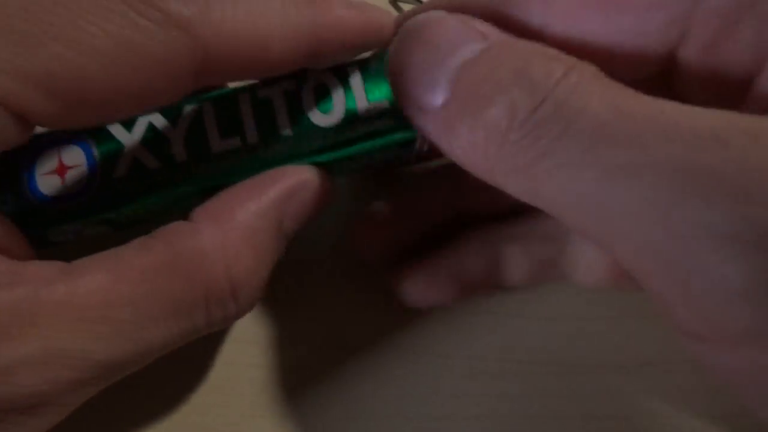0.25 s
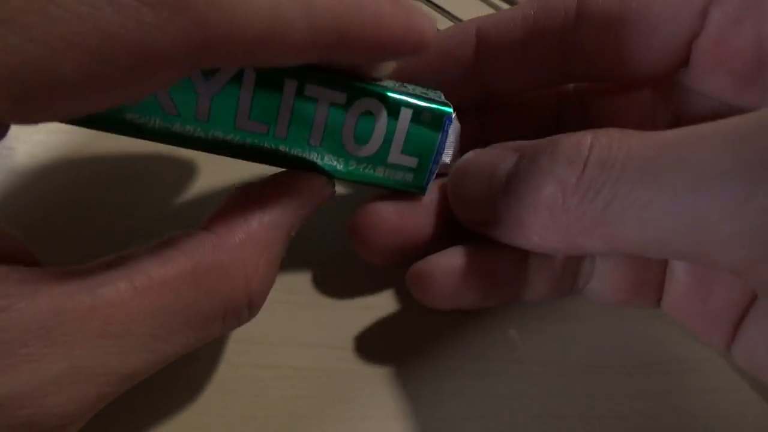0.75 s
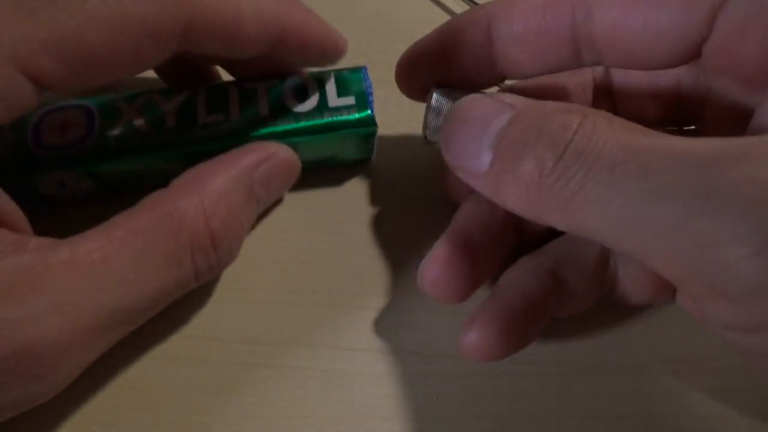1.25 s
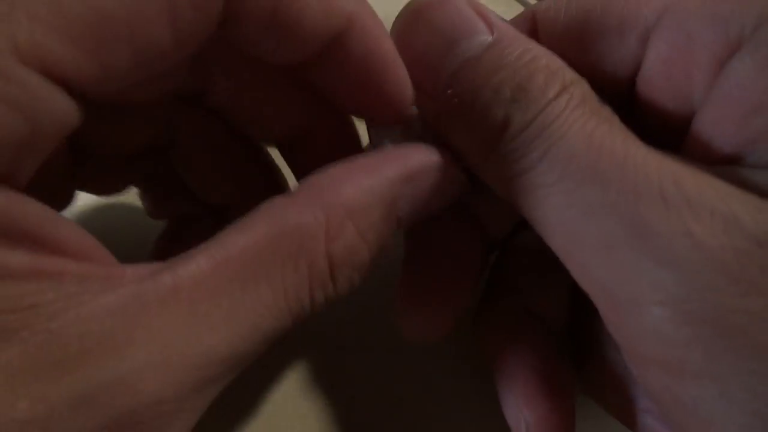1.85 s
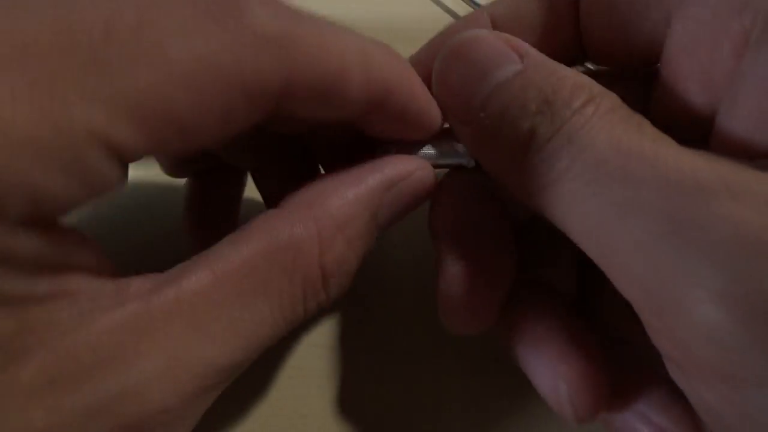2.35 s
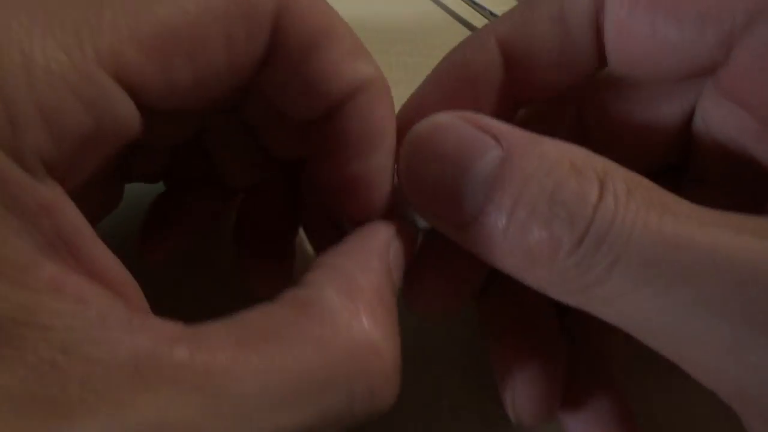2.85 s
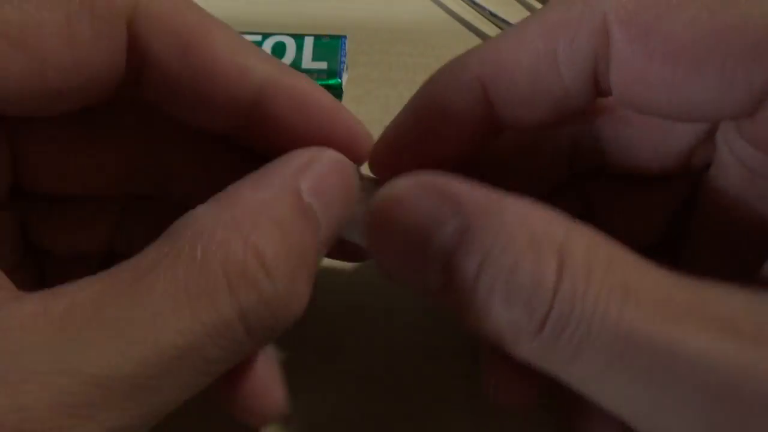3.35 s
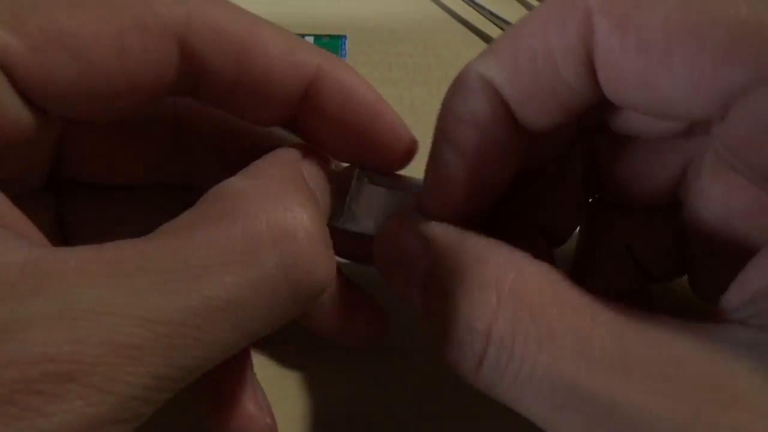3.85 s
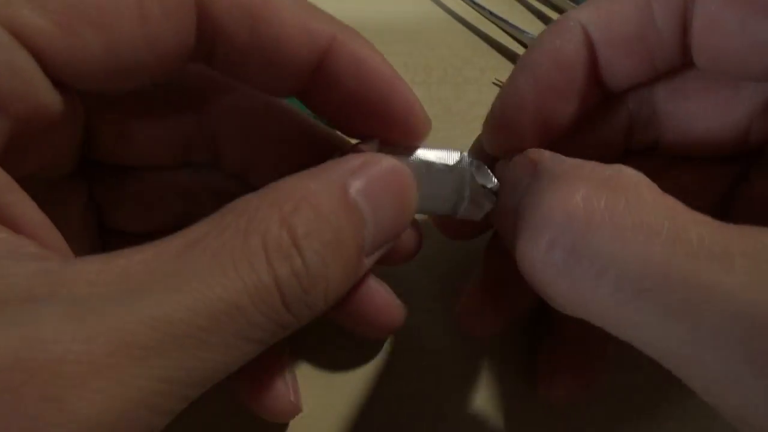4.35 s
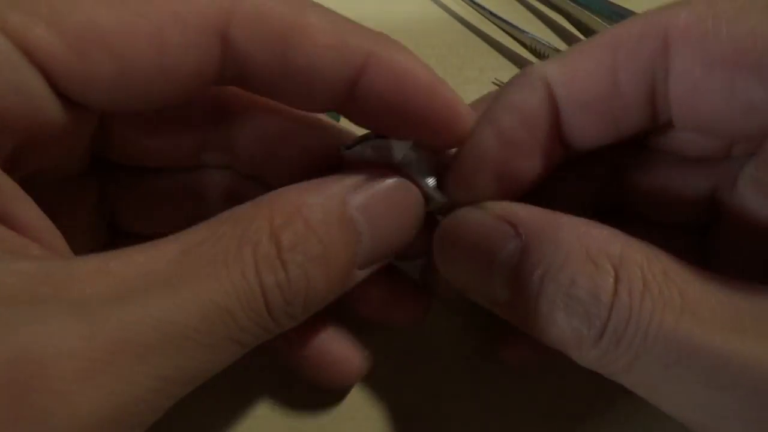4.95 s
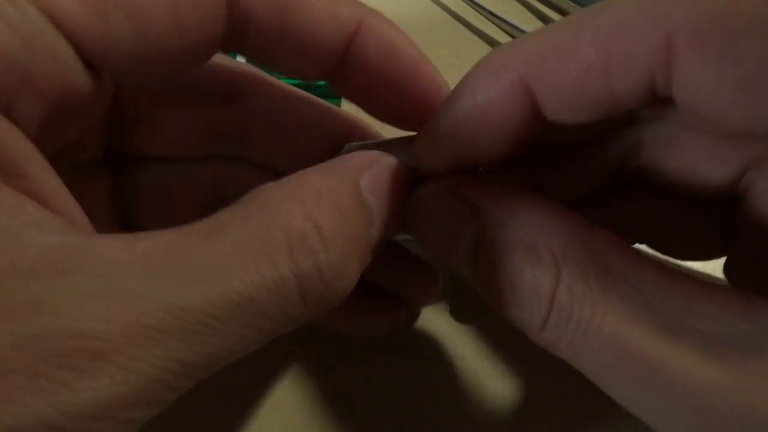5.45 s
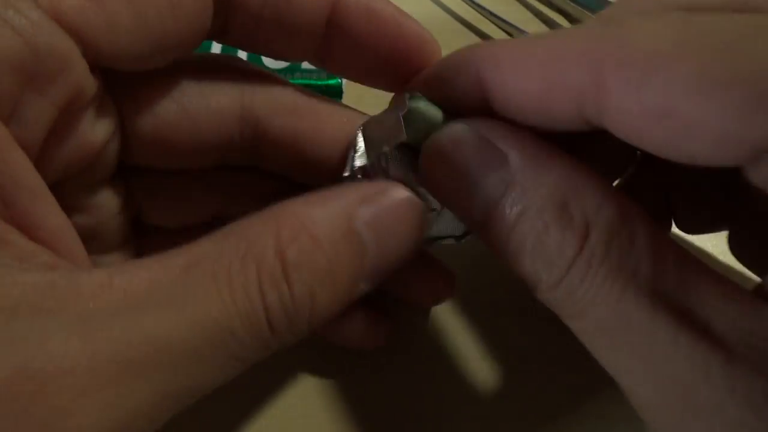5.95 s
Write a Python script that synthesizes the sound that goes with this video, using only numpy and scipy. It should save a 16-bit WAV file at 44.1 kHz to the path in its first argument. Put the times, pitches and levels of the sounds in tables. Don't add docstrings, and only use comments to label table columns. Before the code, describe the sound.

Close, dry crinkling: a little pack rattles and is set down, then thin foil snaps, ticks and rustles under fingertips in a quiet humming room.

```python
import sys
import numpy as np
from scipy import signal
from scipy.fft import rfft, irfft
from scipy.io import wavfile

SR = 44100
rng = np.random.default_rng(int(sys.argv[2]) if len(sys.argv) > 2 else 0)


def generate_wav(signal):
    frames = np.transpose(np.atleast_2d(signal))
    scaled = np.clip(frames, -1, 1) * 32767
    pcm = np.round(scaled).astype(np.int16)
    wavfile.write(sys.argv[1], SR, pcm)


def voltage_ratio(decibels):
    exponent = np.asarray(decibels, float) / 20
    return 10 ** exponent


N = 273861

# frequency in Hz, level in dB per Hz.
ROOM_SPECTRUM = [(15, -6), (25, -20), (48, -9.5), (78, -3.5), (108, 5), (157, -5), (223, 1), (463, -6),
                 (840, -10), (1400, -13.5), (4490, -21), (8140, -19.5), (11900, -31), (14800, -22),
                 (16000, -23.5)]
# time in seconds, level in dB.
ROOM_LEVEL = [(0.0, -56.5), (5.88, -60), (6.21, -59)]
# frequency in Hz, width in Hz, level in dB relative to the room.
APPLIANCE_HUM = [(211, 10.2, -7), (266, 6.1, -13), (303.3, 19, -11), (800, 77, -13)]
# frequency in Hz, level in dB relative to the room.
MAINS_TONES = [(100, -1), (120, -5.5)]

# time in seconds, level in dB, length in seconds, share of high modes in dB.
KNOCKS = [(0.0, -37, 0.04, 0), (0.687, -36, 0.00087, -12), (0.724, -41.5, 0.041, 6.5),
          (0.846, -42.5, 0.0066, -16), (0.943, -52, 0.0033, -10), (1.106, -33, 0.0011, -7),
          (1.117, -36, 0.088, -17), (1.15, -49, 0.035, 4), (1.175, -43, 0.027, -5),
          (4.321, -50, 0.032, -25)]
# frequency in Hz, level in dB, t60 in seconds.
PACK_MODES = [(127, -16, 0.17), (320, -4, 0.0096), (431, 4.5, 0.049), (595, -3.5, 0.016), (759.4, 2, 0.035),
              (1045, -4.5, 0.015), (1290, 1.5, 0.024), (1900, -11, 0.0088), (2800, -9, 0.0024),
              (3350, -2, 0.012), (5810, -7, 0.012), (7100, 4, 0.035), (9200, 3, 0.05), (10060, 4, 0.06)]

# frequency in Hz, level in dB per Hz.
FOIL_SPECTRUM = [(2500, -41), (4000, -25), (5000, -5.5), (6500, 0.5), (8500, -1.5), (12000, -1),
                 (14500, -2), (16500, -8)]
CARD_SPECTRUM = [(180, -56), (300, -10), (628, -3.5), (768, -4.5), (1550, -5.5), (2900, -3.5), (3630, -4.5),
                 (3970, -2), (6000, -15), (7800, -23), (13200, -120)]
LINING_SPECTRUM = [(700, -30), (1500, -14), (2500, -9), (3000, -4), (3500, -.5), (4200, -6), (6000, -12),
                   (8000, -35)]
# start in seconds, pressed time in ms, release in ms, level in dB.
PULLS = [(.231, 83, 8.5, -43), (.468, 50, 7.3, -42), (0.718, 27, 20, -38), (.806, 100, 20, -53),
         (0.934, 17.6, 30, -34.5), (1.072, 41, 33, -39.5), (1.80, 140, 17, -46), (2.159, 54, 58, -43.5),
         (2.268, 81.5, 4.8, -34), (2.586, 49, 41, -40.5), (3.078, 25.4, 39, -30), (3.172, 62, 22, -45),
         (3.555, 81, 13, -50), (3.637, 38, 22, -45), (3.805, 61, 48, -44), (4.138, 18, 8.8, -42.5),
         (4.286, 53.6, 6.1, -29.5), (4.466, 56, 27, -55.5), (4.684, 40, 10, -50), (4.935, 48, 77, -39.5),
         (5.101, 69, 20, -29), (5.236, 34, 24, -47.5), (5.339, 56, 15, -36.5), (5.408, 56, 22, -33),
         (5.659, 78, 12, -37.5), (5.77, 54, 16, -43), (5.888, 45, 7, -33.5), (6.076, 48, 14, -47)]
SLIPS = [(0.0, 19, 126, -45.5), (0.384, 8.2, 17, -47.5), (.52, 56, 120, -45.5), (.659, 28, 32, -30),
         (1.04, 17, 8.9, -47), (1.150, 42, 10, -43), (1.208, 37, 11, -43), (1.338, 150, 10, -46),
         (1.647, 41, 37, -42), (2.792, 8.6, 31, -32.5), (2.836, 18, 14, -30.5), (2.905, 25, 33, -25.5),
         (2.945, 16, 81, -42), (3.13, 49, 28, -48.5), (3.339, 19, 82, -39), (3.681, 7.9, 3, -32.5),
         (3.917, 63, 4, -44.5), (4.059, 24, 14, -37), (4.258, 40, 5, -42.5), (4.36, 37, 4.4, -45),
         (4.4, 32, 4, -45), (4.656, 7.7, 17, -41.5), (4.73, 52, 14, -48.5), (4.796, 21, 60, -50),
         (5.19, 20, 5, -38.5), (5.312, 20, 4, -42), (5.474, 34, 41, -37.5), (5.569, 26, 13, -35),
         (5.94, 11, 125, -33.5)]
PULL_RISE_SHARE, SLIP_RISE_MS = 0.59, 6.1
# time in seconds, rustle between strokes in dB, share of paper under the fingers in dB,
# resonance of the free foil flap in Hz.
GRIP = [(0.0, -62, -4, 9400), (0.9, -54, -2, 9200), (1.1, -58.5, 2.5, 9500), (1.2, -50.5, -18, 9800),
        (1.4, -62, -3, 10200), (1.6, -52, -8.5, 11000), (2.0, -59, -20.5, 10000), (2.45, -49.5, -16, 12300),
        (2.9, -51, -19, 9000), (3.15, -44, -18.5, 8350), (3.55, -50, -15.5, 9400),
        (3.75, -59, -15.5, 10500), (4.3, -49, -19, 7300), (4.6, -69.5, -17, 11500), (4.88, -63, -18, 11200),
        (5.05, -46.5, -15.5, 9800), (5.4, -48, -10, 8800), (6.21, -47.5, -13, 11000)]
PUT_DOWN_S = 1.72
SHUFFLE_START_S, SHUFFLE_END_S = 3.14, 3.62
RESTING_PAPER_DB, SHUFFLE_DB = 2, 8

RINGING_PARTS = [(.2485, 4.2, 2770, 497, -39.5), (.279, 4.5, 1290, 400, -43.5), (.279, 4.6, 2180, 500, -44.5),
                 (.296, 7, 1290, 600, -41.5), (.297, 7.3, 2920, 500, -44), (.378, 9.8, 2870, 600, -49),
                 (.503, 3.3, 1600, 500, -47), (.570, 3.8, 900, 500, -50), (.672, 12, 2930, 200, -40),
                 (.688, 2.8, 3200, 900, -25), (.6885, 2.1, 430, 250, -27.5), (.724, 20, 7080, 120, -36.5),
                 (.724, 27, 5600, 150, -41.5), (.740, 21, 3540, 150, -46), (.723, 6.6, 1010, 300, -42),
                 (.738, 15, 470, 200, -42.5), (1.1048, 2.7, 1590, 900, -21), (1.1048, 1.64, 2860, 900, -17),
                 (1.106, 16, 250, 201, -35), (1.106, 28, 110, 60, -43), (1.110, 24, 3300, 300, -47),
                 (1.164, 16, 3340, 200, -51), (1.150, 45, 607, 80, -45), (1.2095, 3, 2700, 700, -45),
                 (1.218, 6, 5600, 900, -44.5), (1.226, 4.1, 2000, 900, -46), (1.410, 5.7, 900, 600, -49),
                 (3.082, 19, 5400, 700, -38.5), (3.099, 3.9, 3870, 500, -41), (3.113, 2.2, 2550, 900, -36.5),
                (3.097, 6, 9000, 600, -28.5), (4.335, 4.6, 595, 496, -39.5), (4.976, 4.2, 3440, 700, -39.5),
                (5.127, 5, 4800, 700, -41.5), (5.168, 5.9, 2900, 900, -41.5), (5.185, 23, 5800, 500, -48),
                (5.241, 43, 3460, 400, -53.5), (5.361, 17, 3500, 600, -50), (5.370, 5, 6900, 400, -40),
                (5.409, 12, 3530, 500, -43), (5.440, 26, 3460, 500, -46), (5.452, 10, 8300, 400, -35),
                (5.482, 8.7, 1900, 300, -49), (5.728, 2.7, 5560, 600, -24.5),
                 (0.0, 38, 724, 150, -43), (0.0, 43, 290, 80, -44.5), (0.0, 40, 1290, 150, -48),
               (.097, 5, 1290, 1000, -47), (.686, 6.8, 330, 150, -33.5), (.847, 4.7, 1460, 700, -40),
               (.860, 75, 2950, 900, -58), (.955, 18, 2800, 500, -49), (1.041, 7.2, 7070, 500, -40),
               (1.152, 8.9, 7050, 500, -41), (1.170, 20, 7100, 300, -46), (1.170, 14, 5940, 300, -47),
               (1.326, 2.9, 2500, 1500, -48), (1.360, 93, 3000, 800, -52.5),
                 (2.836, 4, 8700, 820, -21.5), (3.129, 2.7, 5400, 690, -30), (4.222, 22, 7250, 400, -36.5),
               (4.260, 36, 9200, 400, -48), (4.470, 54, 11600, 830, -57.5), (4.470, 47, 7900, 700, -59),
               (5.531, 1.5, 3500, 690, -33), (5.955, 7.6, 3550, 550, -42.5), (4.323, 7, 8200, 820, -27),
               (5.330, 120, 3700, 700, -53.5), (3.640, 30, 11800, 1600, -39), (2.762, 7, 8100, 1900, -40.5)]
RING_RISE_MS, RING_FALL_SHARE = 0.62, 0.56

# time in seconds, peak in dB, centre in Hz.
FOLDS = [
    (.249, -23.5, 3200),
    (0.3093, -25.5, 2920),
    (3.8952, -24, 4600),
    (4.2195, -19, 3850),
    (4.9773, -18, 3760),
    (5.6979, -12.5, 4570),
    (5.7293, -14.5, 5400),
    (6.0045, -17, 3700),
]
DRAWING = [(0.2763, -34, 2160), (0.3778, -27, 2720), (0.5127, -15.5, 9050), (0.5777, -26, 8500),
           (0.6885, -15.5, 3070), (0.7312, -17, 7100), (0.9325, -25, 7000), (0.95, -11, 2760),
           (1.0077, -23, 9800), (1.0433, -18, 7500), (1.1052, -14.5, 2540), (1.2199, -15.5, 13500),
           (1.4113, -36, 2940), (1.5183, -19, 13000), (1.7862, -23, 11500)]
PICKING = [(2.0603, -13, 10250), (2.098, -15.5, 11750), (2.292, -10.5, 11200), (2.3235, -19, 11300),
           (2.731, -14, 8500), (2.7657, -24, 8090), (2.799, -12, 12600), (2.838, -19, 9400),
           (2.9025, -7, 9400), (2.9237, -14, 8360), (2.931, -4.5, 9150), (2.941, -20, 8920),
           (2.9602, -20, 8550), (3.0549, -21.5, 9000), (3.0701, -14, 8150), (3.1302, -0.5, 8800),
           (3.2469, -19.5, 9500), (3.346, -13, 11700), (3.3509, -15, 12000), (3.502, -32.5, 8800),
           (3.543, -24, 12300), (3.635, -10, 10500), (3.7321, -8, 9000), (3.802, -23, 11700),
           (3.952, -18, 8900), (3.9652, -22, 8100), (4.08, -18, 9000)]
LIFTING = [(4.1536, -14, 13300), (4.2593, -12, 9200), (4.281, -22, 8730), (4.316, -6, 11300),
           (4.3268, -6, 8400), (4.3366, -4.5, 5930), (4.588, -27, 7400), (4.6187, -28, 12100),
           (4.6507, -18, 7700), (4.7163, -7.5, 13300), (5.128, -19, 9530), (5.3242, -11, 9900),
           (5.4422, -9, 6860), (5.455, -13, 8280), (5.5083, -5, 10100), (5.5191, -4, 10100),
           (5.542, -4, 8500)]
SPREADING = [(5.626, -15.5, 7960), (5.8141, -20.5, 8300), (5.8426, -22, 7000), (5.9295, -14, 9760),
             (5.9469, -14, 12000), (6.042, -22.5, 9300), (6.0998, -14, 10200), (6.1104, -22, 12200),
             (6.1485, -25, 9300), (6.196, -10, 14000)]
FORERUNNERS = [(1.089, -19, 8200), (2.8299, -11.5, 9700), (3.1155, -11, 9100), (3.728, -18, 9200),
               (4.3068, -20, 8400), (4.7048, -22.5, 5400), (5.319, -22, 8000), (5.425, -15, 8800),
               (5.4996, -16, 8800), (5.5338, -20, 8740), (5.5729, -14, 10500), (5.6558, -24, 6200),
               (5.889, -13, 7800), (6.184, -21, 11700)]
DOUBLES = [(2.295, -12, 11500), (2.9058, -7, 9200), (3.0936, -8, 8250), (3.3534, -10, 11900),
           (3.6874, -13, 10000), (3.9279, -6.5, 10800), (4.0665, -13, 8800), (4.3745, -18, 9200),
           (5.158, -15, 10300), (5.2957, -14, 8000), (5.4266, -6, 8700), (5.4803, -12, 10100),
           (5.583, -9.5, 7750), (5.6168, -19, 7840)]
TICKS = [(0.357, -36.5, 7000), (.395, -41, 5040), (3.061, -30, 8000), (3.082, -23, 9000),
         (3.102, -15, 9500), (3.122, -26, 8500), (4.1445, -25.5, 7000), (4.058, -25, 8700),
         (4.0718, -14.5, 8800), (4.388, -22, 10000), (4.415, -37, 12000), (5.1515, -27, 9000),
         (5.156, -25, 9500), (5.170, -26, 8500), (5.487, -13, 9800), (5.649, -29, 6000), (5.624, -27, 9000),
         (4.1658, -8.5, 11900), (4.1763, -8, 10400), (4.1871, -9.5, 11500), (4.2023, -7, 12900),
         (4.214, -7.5, 12900), (4.1965, -25, 10000), (1.577, -32, 10500), (1.871, -34, 9000),
         (2.911, -10, 12500), (2.789, -24, 12000), (3.7375, -29, 7000), (.9075, -31, 9500),
         (3.853, -26, 9000), (4.149, -24, 9000), (4.688, -34, 10000), (4.7185, -17, 8700),
         (4.952, -29.5, 7000), (5.530, -17, 10500), (5.805, -34, 6000), (5.853, -30, 11500),
         (6.154, -32, 11000), (6.166, -30, 11000), (6.173, -27, 11500), (6.201, -21, 10000),
         (5.313, -29, 8000), (5.8872, -22, 7040)]
CRACK_RATIO, CRACK_DB = 2.73, 7
REBOUND_S, REBOUND_DB = 0.0050, -5.5

# start in seconds, end in seconds, first gap in ms, last gap in ms, peak in dB.
PEELS = [(2.8432, 2.8760, 3.0, 2.2, -14.5), (2.9130, 2.9250, 1.3, 1.3, -13),
         (3.6388, 3.6715, 3.2, 2.1, -12.5), (5.9228, 5.9290, 1.2, 1.4, -15),
         (4.2210, 4.2390, 1.7, 2.4, -11), (4.2409, 4.2515, 2.9, 4.2, -13), (5.6623, 5.6950, 3.9, 5.2, -18),
         (5.7010, 5.7260, 3.2, 2.6, -20), (5.9041, 5.9225, 3.3, 2.7, -9)]
PEEL_HZ, PEEL_HZ_PER_DB, PEEL_MEAN_DB = 11200, 358, -11.5
PEEL_PAPER_FOLLOWS, PEEL_PAPER_MEAN_DB = 1.75, -15.5
STICK_DB_PER_OCTAVE = 2
PEEL_FADE_DB = -3.5

# frequency in Hz, side level in dB relative to mid.
PORTS_SPECTRUM = [(30, -19.5), (400, -7.5), (1500, -14.5), (5000, -14), (9500, -7.5), (12500, -16),
                  (16000, -17.5)]


def at_hz(points, hz):
    table = np.array(points)
    return np.interp(np.log(hz + 1), np.log(table[:, 0]), table[:, 1])


def coloured(x, spectrum):
    gain = voltage_ratio(at_hz(spectrum, np.linspace(0, SR / 2, 2049)))
    cepstrum = irfft(np.log(gain / np.sqrt(np.mean(gain ** 2))))
    cepstrum[1:2048] *= 2
    cepstrum[2049:] = 0
    impulse = irfft(np.exp(rfft(cepstrum)))
    return signal.oaconvolve(x, impulse)[:N]


def band(x, edges_hz):
    return signal.sosfilt(signal.butter(2, edges_hz, "band", fs=SR, output="sos"), x)


def ring(x, hz, width_hz):
    r = np.exp(-np.pi * width_hz / SR)
    feedback = [1, -2 * r * np.cos(2 * np.pi * hz / SR), r * r]
    return signal.lfilter([(1 - r * r) / 2, 0, (r * r - 1) / 2], feedback, x)


def drift(rate):
    knots = rng.standard_normal(3000)
    return np.interp(np.arange(N) / SR * rate, np.arange(3000), knots)


def add_at(out, s, sound):
    start = round(s * SR)
    out[start:start + len(sound)] += sound


def room():
    t = np.arange(N) / SR
    air = coloured(rng.standard_normal(N), ROOM_SPECTRUM) * voltage_ratio(0.5 + 1.2 * drift(3.28))
    for hz, width_hz, hum_db in APPLIANCE_HUM:
        line = ring(rng.standard_normal(N), hz, width_hz)
        air = air + voltage_ratio(hum_db) * line / np.std(line)
    for hz, hum_db in MAINS_TONES:
        level = voltage_ratio(hum_db + 1.5 * drift(6))
        air = air + level * np.sin(2 * np.pi * hz * t + 0.8 * drift(9))
    s, db = np.transpose(ROOM_LEVEL)
    return air * voltage_ratio(np.interp(t, s, db))


def pack_knocks():
    out, t = np.zeros(N + 8192), np.arange(8192) / SR
    for s, db, length, high_db in KNOCKS:
        chatter = rng.standard_normal(8192) * voltage_ratio(-20 * t / length) / np.sqrt(length)
        add_at(out, s, voltage_ratio(db - 16.5) * band(chatter, [150, 2200]))
        for (hz, mode_db, t60), luck_db in zip(PACK_MODES, rng.normal(0, 3.46, len(PACK_MODES))):
            strength = voltage_ratio(db + mode_db + luck_db + 2.0 + (high_db if hz > 3000 else 0))
            add_at(out, s, strength * ring(chatter, hz, 1.69 / t60))
    return out[:N]


def grains(per_s, spread_db, smooth):
    born = rng.random(N) < per_s / SR
    sizes = voltage_ratio(spread_db * np.minimum(rng.exponential(1, N), 3.2))
    creases = sizes * rng.choice([-1, 1], N) * born
    skin = smooth * rng.standard_normal(N)
    return (creases / np.std(creases) + skin) / np.sqrt(1 + smooth ** 2)


def strokes(t):
    power = np.zeros(N)
    rows = [(PULL_RISE_SHARE * row[1], *row) for row in PULLS]
    rows += [(SLIP_RISE_MS, *row) for row in SLIPS]
    shape_db = [-11.5, -12.5, -1.47, -1.5, -26.0, -35]
    for rise_ms, start, pressed_ms, release_ms, db in rows:
        hold_ms = max(pressed_ms - rise_ms, 1)
        corners = start + np.cumsum([-4, 4, rise_ms, hold_ms, release_ms, 8]) / 1000
        span = slice(max(round(corners[0] * SR), 0), round(corners[-1] * SR))
        power[span] += voltage_ratio(db + np.interp(t[span], corners, shape_db)) ** 2
    return power


def facets(x, y, flap_hz, lift_db, patchy_db):
    out = 0
    for k, hz in enumerate(np.geomspace(3000, 16500, 14)):
        near = np.exp(-(np.log(hz / flap_hz) / 0.19) ** 2)
        level = voltage_ratio(lift_db * near + patchy_db * drift(16))
        out = out + level * ring(y if k % 2 else x, hz, 0.13 * hz)
    return out / np.std(out)


def rubbing():
    t = np.arange(N) / SR
    s, rustle_db, paper_db, flap_hz = np.transpose(GRIP)
    shuffling = (t > SHUFFLE_START_S) & (t < SHUFFLE_END_S)
    resting = voltage_ratio(np.interp(t, s, rustle_db) - 5.0) ** 2
    moving = strokes(t)
    foil_power = resting + moving
    resting_paper = resting * voltage_ratio(RESTING_PAPER_DB + SHUFFLE_DB * shuffling) ** 2
    paper_power = voltage_ratio(np.interp(t, s, paper_db)) ** 2 * (moving + resting_paper)
    clumps = voltage_ratio(1.4 * drift(120) + 1.2 * drift(400))

    crackle = grains(2200, 2.6, smooth=0.9)
    turned = crackle * rng.choice([-1, 1], N)
    foil = facets(coloured(crackle, FOIL_SPECTRUM), coloured(turned, FOIL_SPECTRUM),
                  np.interp(t, s, flap_hz), lift_db=10, patchy_db=4.5)

    rough = grains(1200, 1.9, smooth=0.69)
    on_card = (t < PUT_DOWN_S) | shuffling
    paper = np.where(on_card, coloured(rough, CARD_SPECTRUM), coloured(rough, LINING_SPECTRUM))
    paper = paper * voltage_ratio(1.9 * drift(40))
    return clumps * (np.sqrt(foil_power) * foil + np.sqrt(paper_power) * paper)


def ringing():
    out, ms = np.zeros(N + 4096), np.arange(4096) / SR * 1000
    rows = RINGING_PARTS
    for s, driven_ms, hz, width_hz, db in rows:
        fall = np.maximum(ms / driven_ms - 1 + RING_FALL_SHARE, 0) / RING_FALL_SHARE
        push = np.clip(ms / RING_RISE_MS, 0, 1) * voltage_ratio(-20 * fall)
        tone = ring(rng.standard_normal(4096) * push, hz, 1.5 * width_hz)
        tone = ring(tone, hz, 1.5 * width_hz)
        add_at(out, s, voltage_ratio(db) * tone * np.sqrt(driven_ms * SR / 1000) / np.linalg.norm(tone))
    return out[:N]


def crease(hz, noise, bright_t60=.0028, dull_t60=.004, tail_db=-28, tail_t60=.025, paper_db=0, pitched=3.0):
    t, hz = np.arange(1024) / SR, np.clip(hz, 2500, 13500)
    burst = noise[0] * (voltage_ratio(-60 * t / bright_t60) + voltage_ratio(tail_db - 60 * t / tail_t60))
    burst[40:] += 0.3 * burst[:-40]
    burst[0] = 3.88
    bright = band(burst, [max(0.54 * hz, 4200), np.clip(1.576 * hz, 9000, 17500)])
    bright = bright + pitched * ring(bright, max(hz, 5000), 0.2 * hz)
    dull = band(noise[1] * voltage_ratio(-60 * t / dull_t60), [min(0.65 * hz, 2400), 4600])
    dull_db = at_hz([(3000, 10.5), (6000, -22.5), (8000, -14.5), (11000, -37)], hz) + paper_db
    both = bright / np.linalg.norm(bright) + voltage_ratio(dull_db) * dull / np.linalg.norm(dull)
    return both / np.abs(both).max()


def paper_gripped(s):
    grip_s, _, paper_db, _ = np.transpose(GRIP)
    return np.interp(s, grip_s, paper_db) - PEEL_PAPER_MEAN_DB


def single_snaps():
    out = np.zeros(N + 1024)
    rows = [*DRAWING, *PICKING, *LIFTING, *SPREADING, *FORERUNNERS, *FOLDS, *DOUBLES]
    rows += [(s + REBOUND_S, db + REBOUND_DB, hz) for s, db, hz in DOUBLES]
    rows += [(s, db + CRACK_DB, hz * CRACK_RATIO) for s, db, hz in FOLDS]
    for s, db, hz in rows:
        paper_db = 0.63 * paper_gripped(s) * (s > PUT_DOWN_S)
        add_at(out, s, voltage_ratio(db - 2.5) * crease(hz, rng.standard_normal((2, 1024)), paper_db=paper_db))
    return out[:N]


def ticks():
    out = np.zeros(N + 1024)
    for s, db, hz in TICKS:
        add_at(out, s, voltage_ratio(db) * crease(hz, rng.standard_normal((2, 1024))))
    return out[:N]


def peels():
    out = np.zeros(N + 1024)
    for start, end, first_ms, last_ms, db in PEELS:
        hz = PEEL_HZ + PEEL_HZ_PER_DB * (db - PEEL_MEAN_DB)
        paper_db = PEEL_PAPER_FOLLOWS * paper_gripped(start)
        pitched = max(2.8 - 0.22 * paper_db, 0.6)
        fold = rng.standard_normal((2, 1024))
        s = start
        for _ in range(30):
            if s >= end:
                break
            noise = rng.standard_normal((2, 1024))
            gap_ms = np.interp(s, [start, end], [first_ms, last_ms])
            stick_db = STICK_DB_PER_OCTAVE * np.log2(gap_ms / np.sqrt(first_ms * last_ms))
            fade_db = PEEL_FADE_DB * ((s - start) / (end - start)) ** 3
            slip = crease(hz, fold + 0.35 * noise, bright_t60=0.0021, tail_db=-24,
                          paper_db=paper_db, pitched=pitched)
            add_at(out, s, voltage_ratio(db + 2.5 + stick_db + fade_db + 1.5 * noise[0, -1]) * slip)
            s += gap_ms * (1 + 0.06 * noise[1, -1]) / 1000
    return out[:N]


def scene():
    soft = signal.cheby2(14, 60, 16300, fs=SR, output="sos")
    air, other_air, place = room(), room(), drift(40)
    hands = signal.sosfilt(soft, pack_knocks() + rubbing())
    hands = hands + ringing() + single_snaps() + ticks() + peels()
    mid = hands + signal.sosfilt(soft, air)
    other = np.roll(hands, 9) * (0.33 + 0.86 * place) + other_air
    side = voltage_ratio(-21.0) * coloured(other, PORTS_SPECTRUM) + 0.025 * hands
    return np.array([mid + side, mid - side])


def band_limit(x):
    return signal.sosfilt(signal.butter(12, 17030, fs=SR, output="sos"), x)


def record(dry):
    rounded = 0.4 * np.tanh(dry / 0.4)
    mix = signal.sosfilt(signal.cheby2(12, 70, 17250, fs=SR, output="sos"), rounded)
    return band_limit(mix)


dry = scene()
out = record(dry)
generate_wav(out)
```